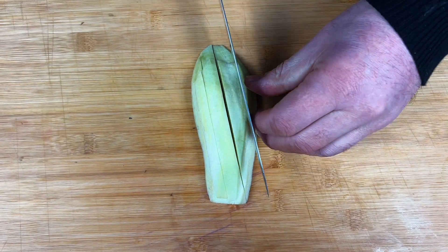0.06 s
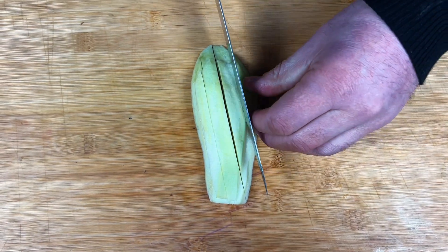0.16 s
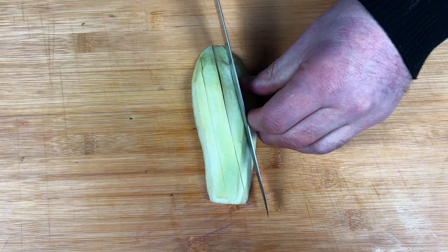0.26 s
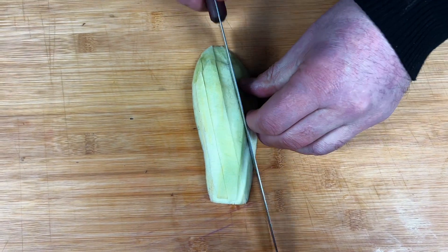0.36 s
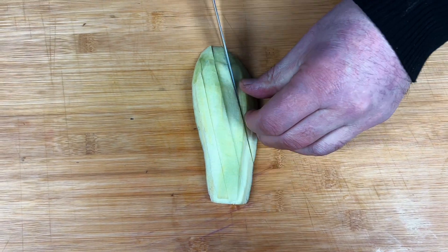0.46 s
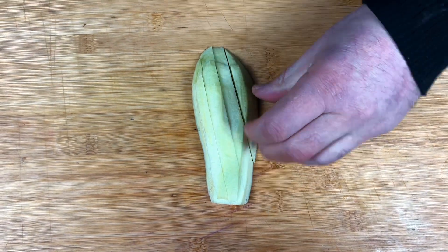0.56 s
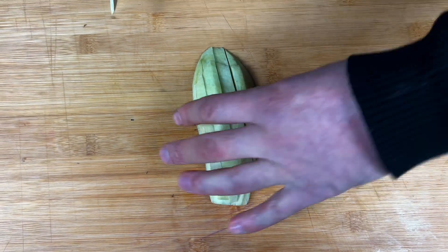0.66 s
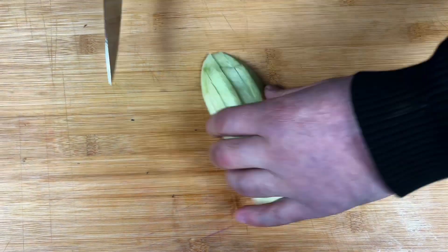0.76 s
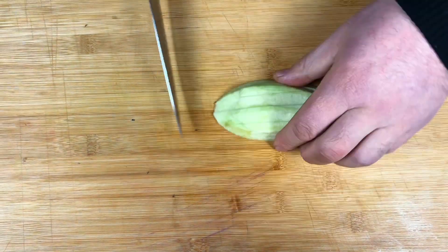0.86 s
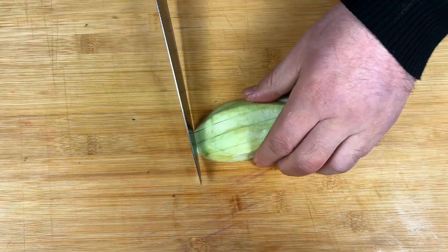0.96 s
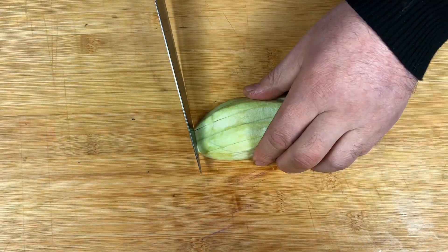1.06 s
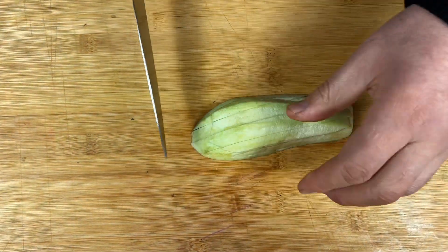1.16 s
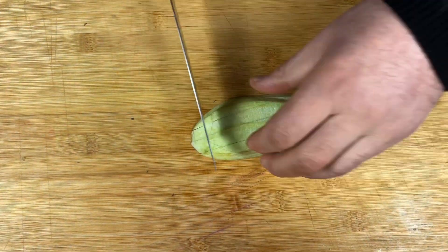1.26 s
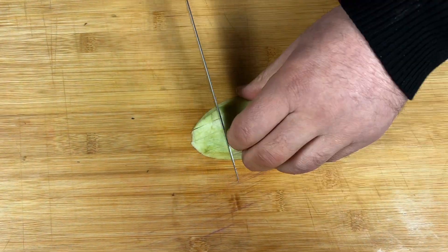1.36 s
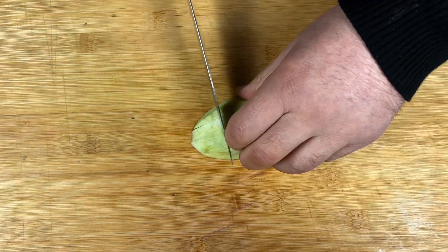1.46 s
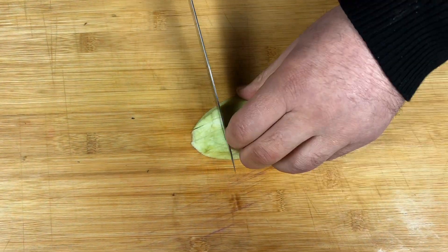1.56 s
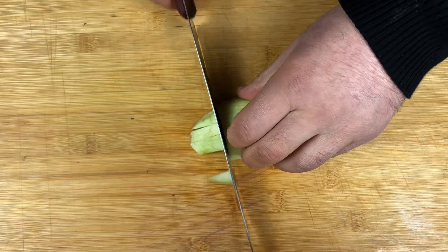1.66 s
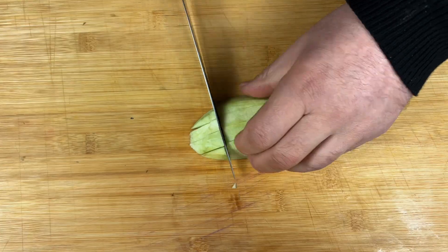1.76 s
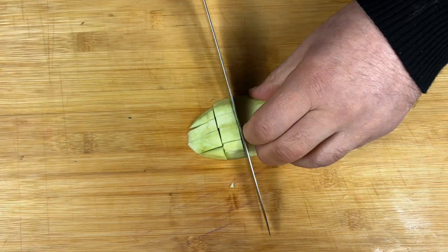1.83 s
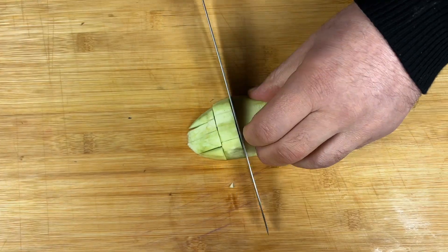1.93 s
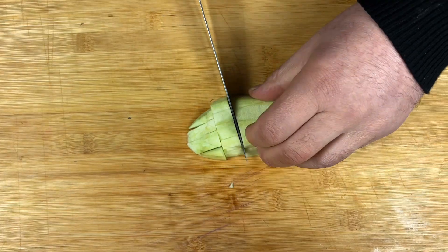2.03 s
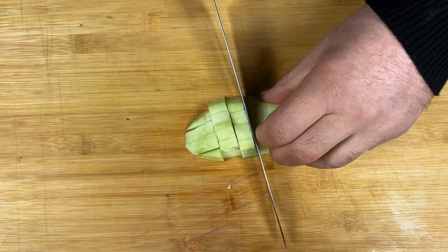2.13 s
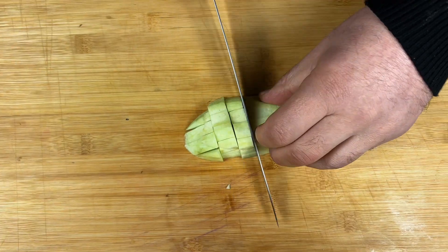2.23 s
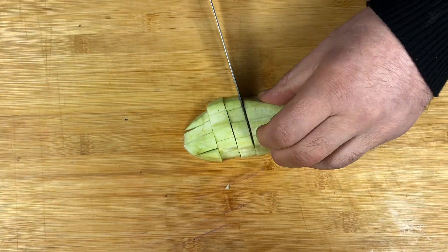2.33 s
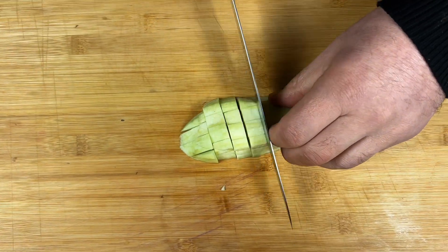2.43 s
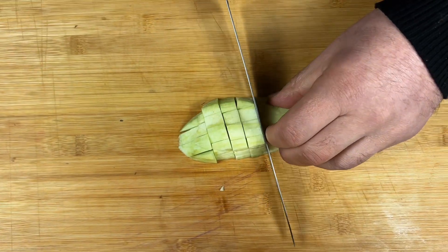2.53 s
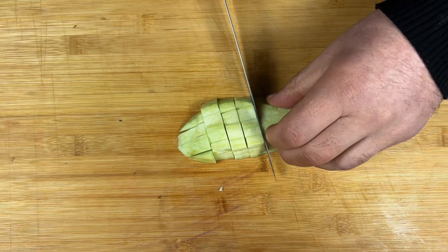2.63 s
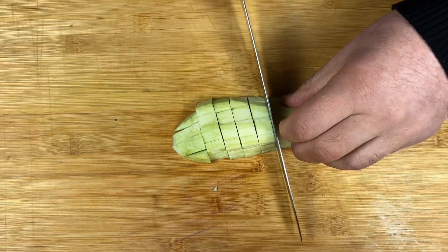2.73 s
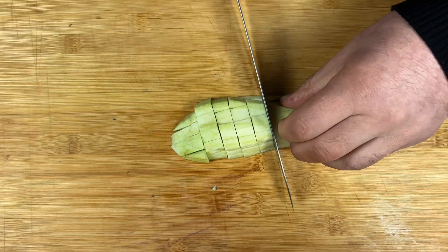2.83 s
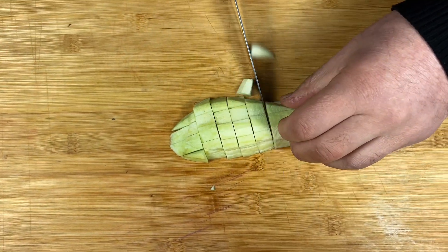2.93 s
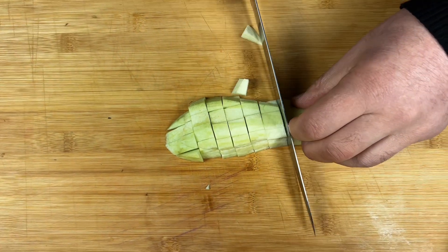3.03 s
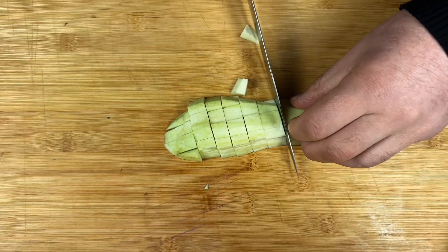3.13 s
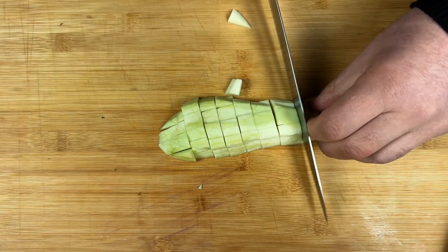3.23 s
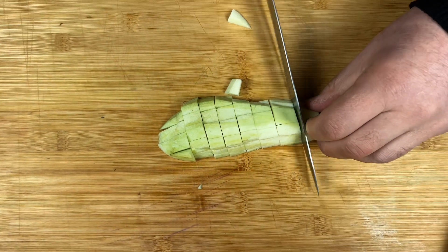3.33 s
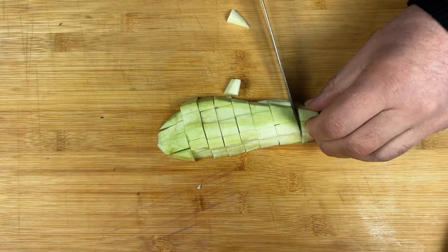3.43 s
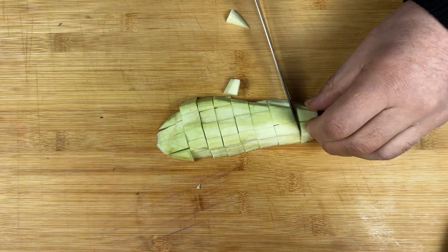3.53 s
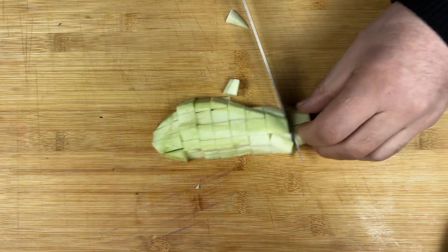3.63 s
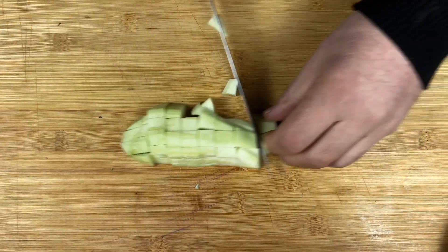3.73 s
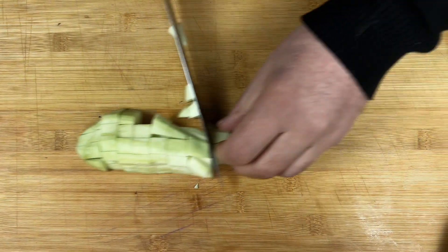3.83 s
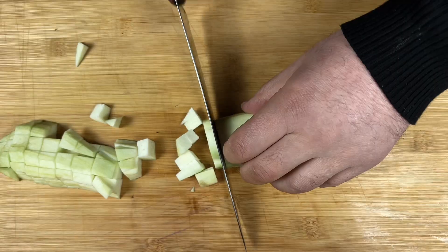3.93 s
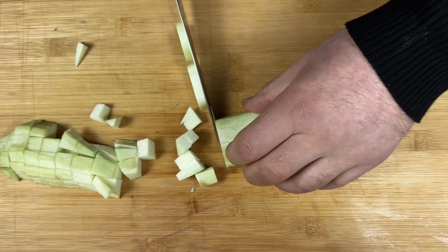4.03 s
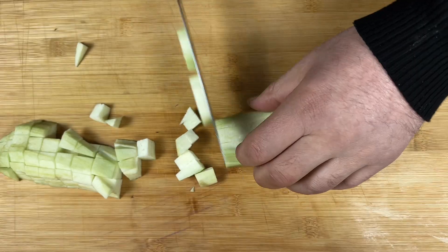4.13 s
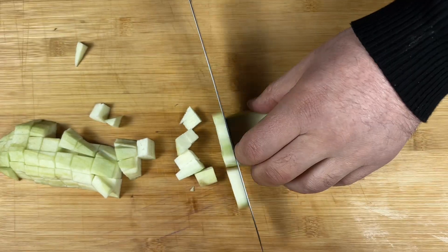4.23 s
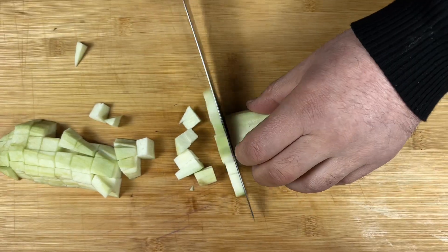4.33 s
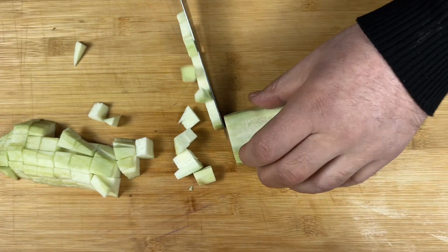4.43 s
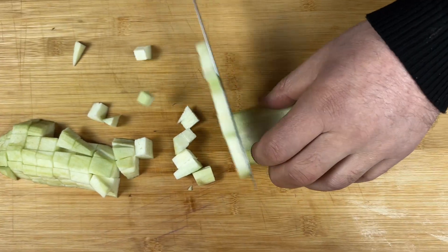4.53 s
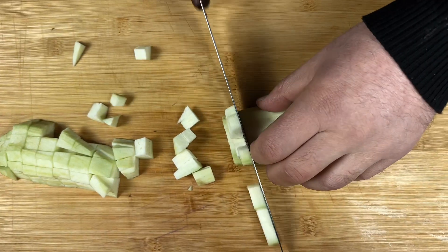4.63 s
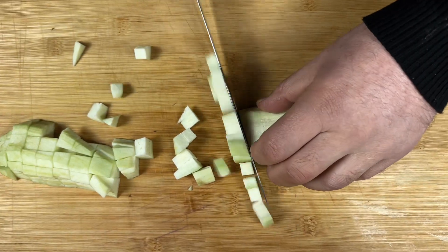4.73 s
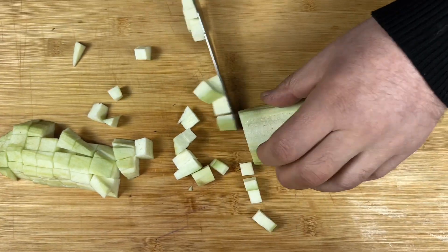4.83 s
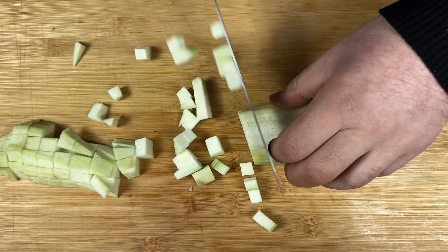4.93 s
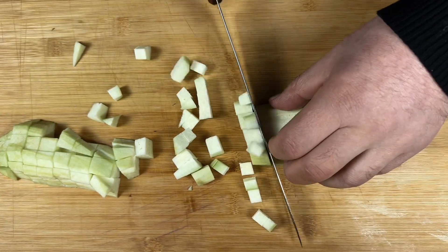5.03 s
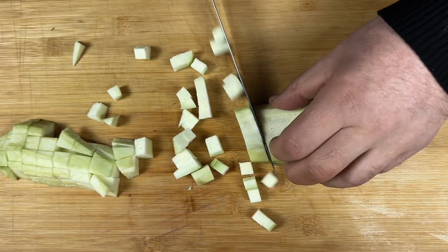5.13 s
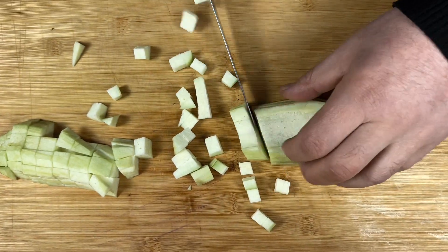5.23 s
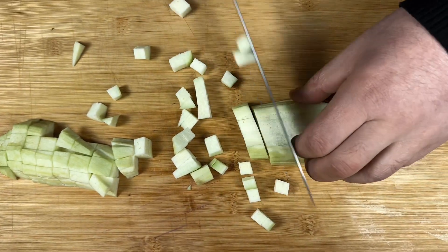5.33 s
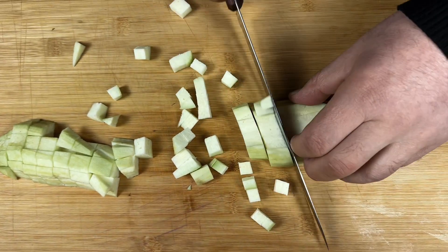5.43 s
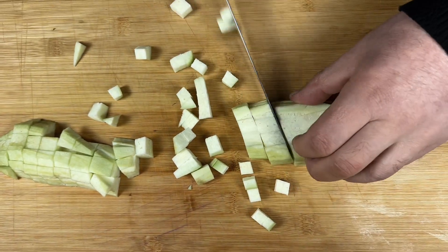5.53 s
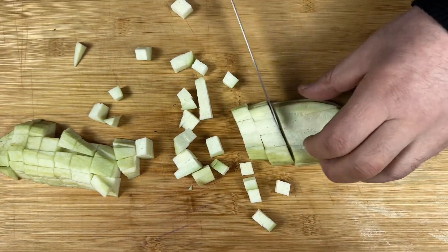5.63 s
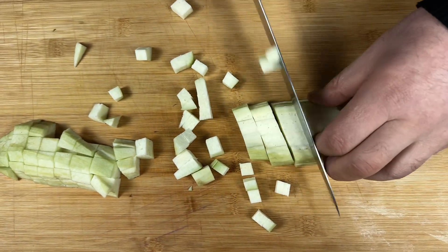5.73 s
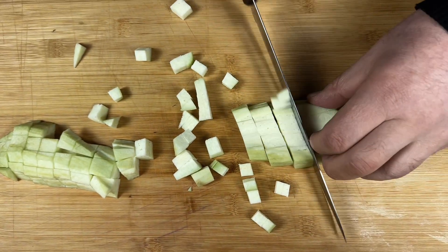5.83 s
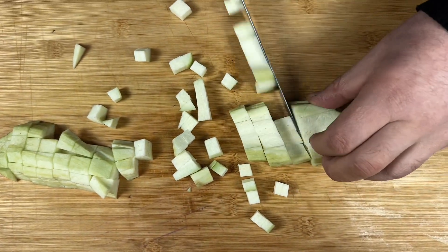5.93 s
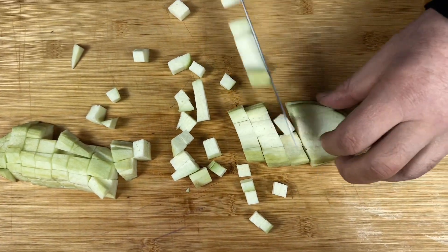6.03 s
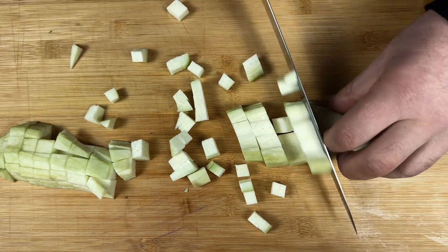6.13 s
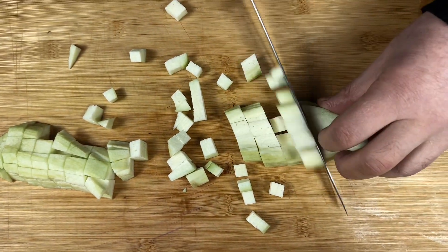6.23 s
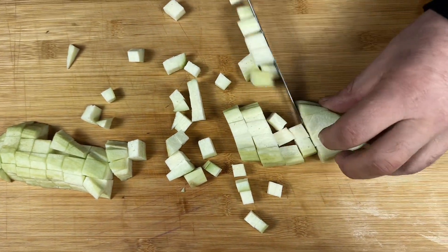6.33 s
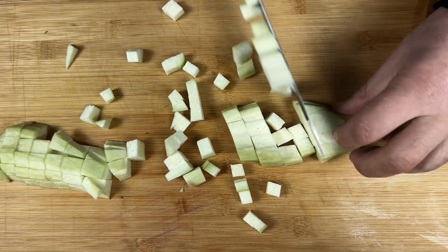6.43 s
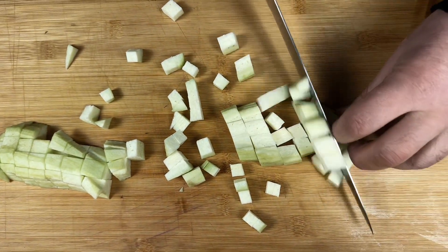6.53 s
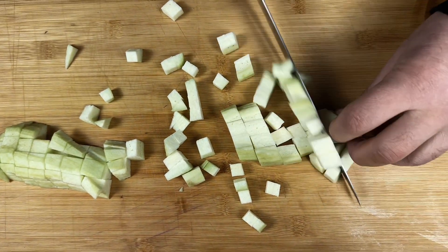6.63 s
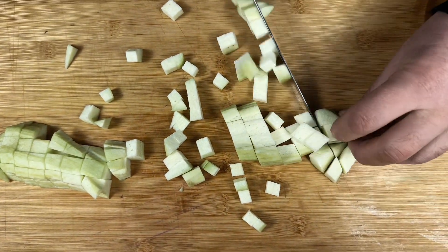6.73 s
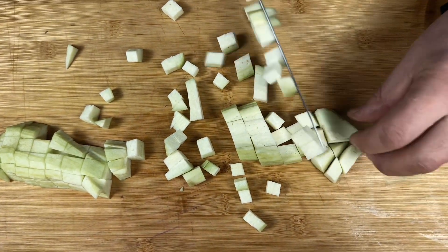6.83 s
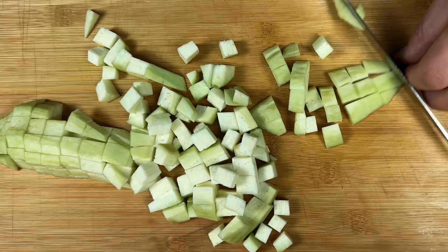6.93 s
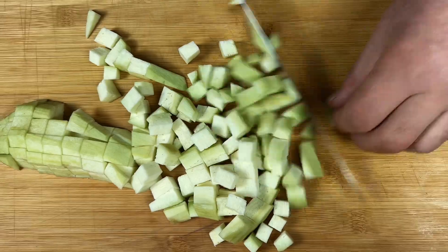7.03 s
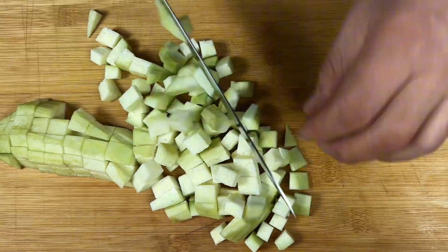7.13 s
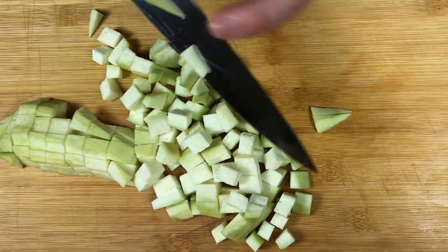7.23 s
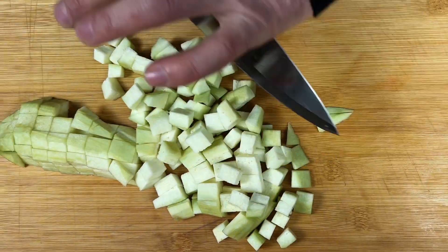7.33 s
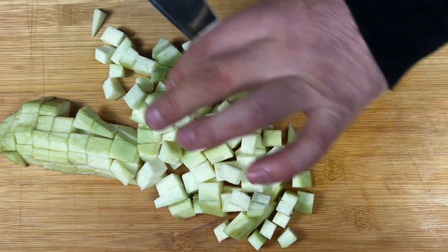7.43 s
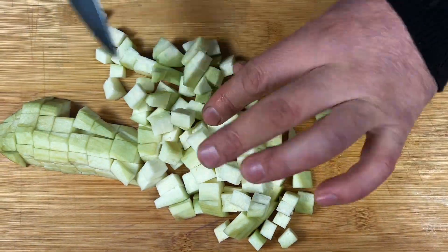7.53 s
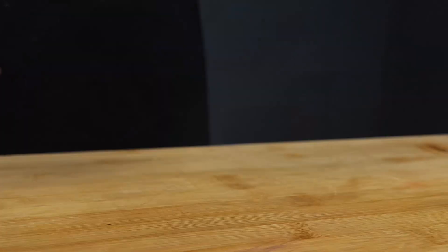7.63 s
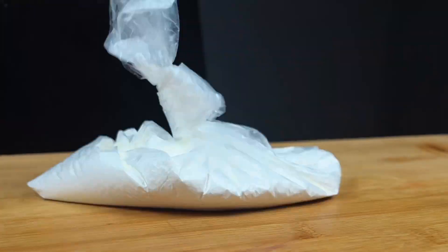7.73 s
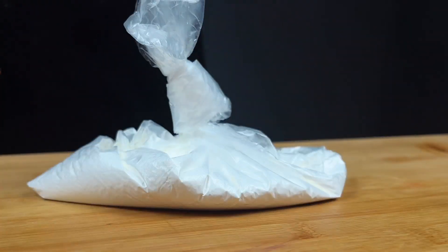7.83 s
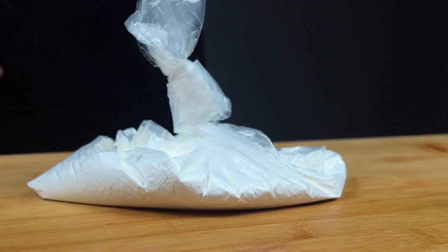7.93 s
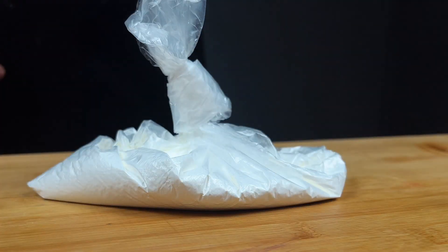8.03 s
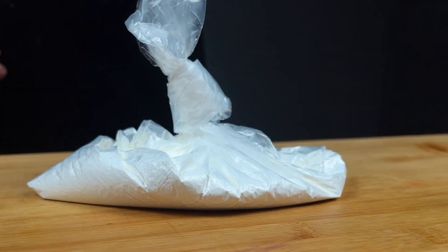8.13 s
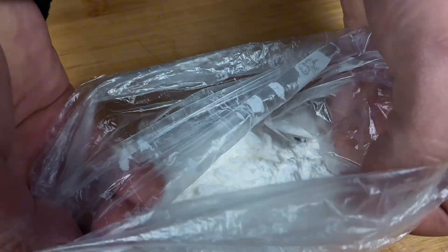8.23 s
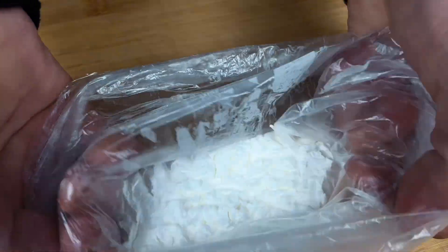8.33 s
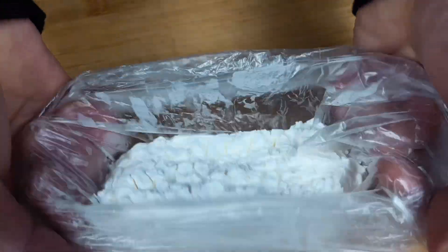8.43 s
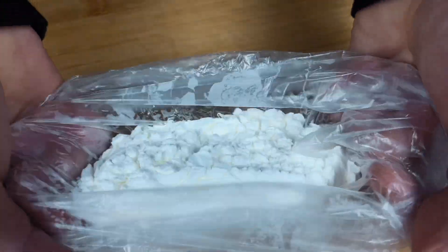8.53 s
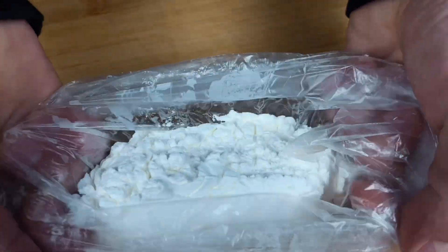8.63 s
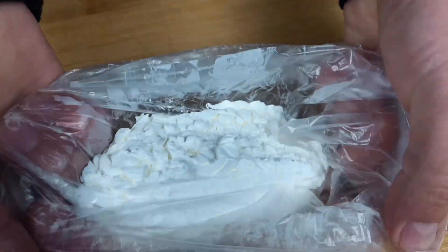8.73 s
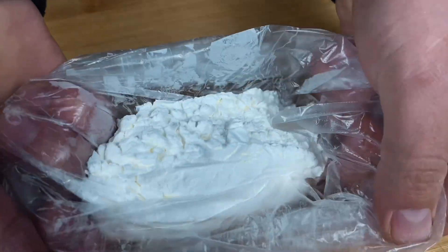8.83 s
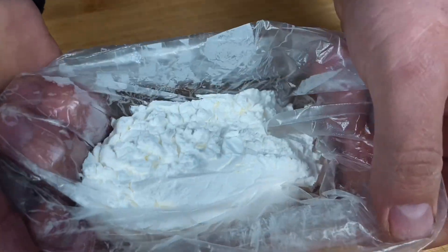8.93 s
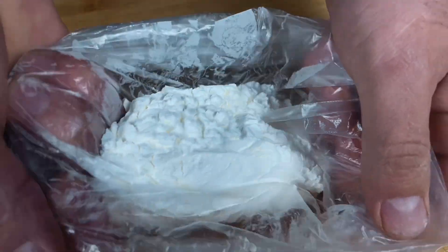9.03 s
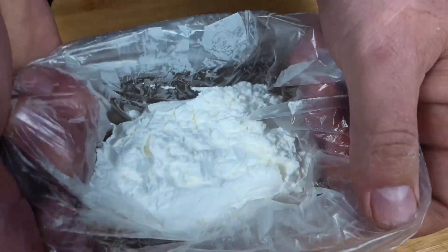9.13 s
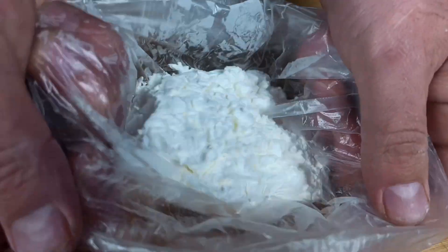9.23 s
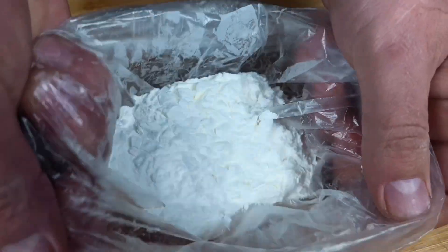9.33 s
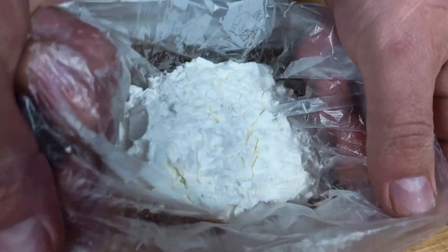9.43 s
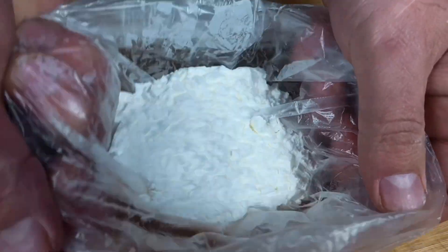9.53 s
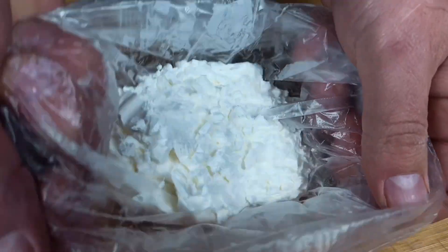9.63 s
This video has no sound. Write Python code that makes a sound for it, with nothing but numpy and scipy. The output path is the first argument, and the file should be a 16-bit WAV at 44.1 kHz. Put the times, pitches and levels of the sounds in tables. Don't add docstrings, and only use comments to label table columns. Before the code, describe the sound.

Close up in a small, fairly dry kitchen, a knife dices a soft vegetable: each stroke crunches, knocks hard on a hollow-sounding wooden board and rasps back along it. After the last light scrape, a heavy bag of powder slaps and thumps down and settles. Then hands crinkle thin plastic close to spaced stereo microphones, with crisp pops.

```python
import sys
import numpy as np
from scipy import signal
from scipy.fft import rfft, irfft, next_fast_len
from scipy.io import wavfile
from scipy.ndimage import map_coordinates

SR = 44100
rng = np.random.default_rng(int(sys.argv[2]) if len(sys.argv) > 2 else 0)


def how_loud(loudness_db):
    steps = np.asarray(loudness_db, float) / 20
    return 10 ** steps


def transcribe(u):
    v = np.clip(np.atleast_2d(u).T, -1, 1)
    q = np.round(v * 32767).astype(np.int16)
    wavfile.write(sys.argv[1], SR, q)


N = 426447

DROP_S, SCENE_CHANGE_S = 7.669, 8.148
HELD_DB = -38.5

# (start_s, knock_peak_db, bright_re_knock_db, edge_tick_re_knock_db, contact_ms)
CHOPS = [(0.32, -8, 1.5, -35, 1.9), (0.945, -17.5, -3, -32, 2.2), (1.677, -8, -2, -48, 2.6),
         (1.893, -4, 4, -32.5, 1.6), (2.188, -20.5, 2.5, -24, 2.8), (2.522, -2, -1.5, -30, 2),
         (3.011, -3, -1, -28.5, 1.4), (3.339, -9, 8.5, -19.5, 1.48), (4.306, -6, -1.5, -18, 1.4),
         (4.635, -5.5, 1.5, -52, 1.64), (5.03, -8, -1, -49, 1.38), (5.407, -6.5, -2.5, -48, 1.86),
         (6.212, -9.5, 0.5, -36, 1.8), (6.611, -10, -3, -49, 1.4)]
PRESSES = [(0.734, -42.5, -18, -15, 3.5), (0.933, -26, -7, -26, 4.1), (1.053, -43.5, -28, -33, 5),
           (2.786, -14, -12, -42, 2.3), (3.942, -35, 4, -12, 1.6), (4.244, -32, -13.5, -32, 3.8),
           (4.556, -32, -14, -26, 3.6), (4.964, -27.5, -15, -21, 3.1), (5.355, -35.5, -9, -11.5, 3.2),
           (5.75, -38.5, -10, -23, 4.3), (5.786, -15, -4.5, -47, 11), (6.117, -36, -13, -20, 5.7),
           (6.192, -19.5, 4.5, -20, 7.7), (6.89, -37.5, 3, -8, 4.2), (7.486, -45, -24.5, -30.5, 3.37),
           (2.81, -15.5, -14.5, -38, 2.3)]
# (pitch_hz, likeness from -1 to 1)
LIKENESS = [(60, .8), (300, .93), (470, .78), (650, .2), (1400, .03), (7000, 0), (15000, .15)]


def knocks():
    rebounds = [(1.692, -19.5, -12, -40, 2.6), (1.908, -12, -10, -40.5, 3.1), (2.54, -15, -9.5, -40.5, 3),
                (3.028, -12.5, -10, -40, 3.1), (3.357, -14.5, -6.5, -40.5, 3), (4.324, -22, -9.5, -41, 2.8),
                (4.652, -23, -10, -40, 2.7), (5.048, -25, -9, -40, 2.7), (5.425, -22, -10, -41, 2.9),
                (6.229, -23, -2, -40, 2.8), (6.628, -29, -10, -40, 2.97)]
    # (pitch_hz, level_db, t60_s)
    board_low = [(180, -12.5, 0.17), (225, -35, 0.083), (295, -9, 0.018), (351.5, 9.5, 0.061),
                 (406, -7, 0.05), (431.5, -3.5, 0.12)]
    board_high = [(534, -5, 0.048), (713, -1, .04), (756, -10.5, 0.057), (880, 1, 0.027), (932, -4.5, 0.17),
                  (1107, 0, 0.062), (1160, 1.5, 0.052), (1285, 2.5, .035), (1450, -9.5, 0.045),
                  (1624, -1, 0.086), (1780, -2.5, 0.011), (2020, -10.5, 0.025), (2086, -6, 0.043),
                  (2370, -13.5, .02), (3000, -17.5, 0.035)]
    # (knock_s, pitch_hz, level_db)
    spots = [(.32, 1700, 6), (.944, 750, 13), (.93, 750, 13), (1.676, 1600, 11), (1.893, 1600, 8),
             (2.188, 1200, 3), (2.522, 1500, 7), (2.786, 750, 5), (3.011, 1093, 5.5), (3.339, 2400, 8.5),
             (4.635, 2100, 6.5), (5.03, 1000, 6.5), (1.676, 750, -6), (1.893, 800, -7), (4.306, 1100, 9),
             (3.339, 781, -7), (2.522, 1000, 4), (5.407, 1000, 8), (5.407, 2200, 4.5), (5.786, 720, 3),
             (6.192, 2400, 11), (6.212, 2300, 9), (6.611, 1100, 5), (6.611, 2300, 2)]
    spot_octaves, low_lag_s = 0.3, 0.0013
    out = np.zeros((2, N))
    t_ms = np.arange(4000) / SR * 1000
    edge = signal.butter(2, [2800, 7000], "band", fs=SR, output="sos")
    wood = signal.butter(2, [500, 3400], "band", fs=SR, output="sos")
    low_cut = signal.butter(4, 165, "high", fs=SR, output="sos")
    for s, knock_db, bright_db, tick_db, contact_ms in CHOPS + PRESSES + rebounds:
        u = np.minimum(t_ms / max(contact_ms, 0.2), 15)
        rough = rng.standard_normal((3, len(u)))
        swell = u ** 2 * np.exp(-u) + 0.2 * (1 - np.exp(-u))
        burst = u ** 2 * np.exp(-2.5 * u)

        low = np.array(board_low) * [1, np.clip(contact_ms / 3, 1, 2), np.clip(contact_ms / 4, 1, 1.4)]
        low_ring = swell * struck(low, 0.98, size=4000)
        add(out, s + low_lag_s, signal.sosfilt(low_cut, low_ring), knock_db)

        high = np.array(board_high)
        tilt_db = 0.7 * min(bright_db + 3, 0) - 2.6 * np.clip(contact_ms - 2, 0, 3)
        high[:, 1] += tilt_db * np.log2(high[:, 0] / 700)
        for spot_s, hz, db in spots:
            if abs(s - spot_s) < 0.005:
                high[:, 1] += db * np.exp(-(np.log2(high[:, 0] / hz) / spot_octaves) ** 2)
        scatter = (burst * rough[0])[None, :1500]
        bright = signal.fftconvolve(struck(high, 2.9, size=2501), scatter)
        bright = bright * (0.23 + np.exp(-0.4 * u))
        add(out, s, signal.sosfilt(wood, bright), knock_db + bright_db)

        tick = burst * (rough[1:] + 0.6 * rough[0])
        add(out, s, signal.sosfilt(edge, tick), knock_db + tick_db)
    return out


def strokes():
    # (pitch_hz, level_db per Hz)
    rumble_colour = [(76, -51.5), (130, -24.5), (189, -7), (259, -7.5), (351, -4), (462, -4), (506, -16),
                     (700, -14.5), (910, -43.5), (1540, -120)]
    rasp_colour = [(320, -32.5), (550, -6.5), (815, -7), (1050, -3), (1450, -4), (2100, -6.5),
                   (2750, -14.5), (3600, -19.5), (4680, -30.5), (7920, -120)]
    hiss_colour = [(1530, -28), (2600, -1), (5300, -7), (10100, -18.5), (12700, -24), (13700, -27.5),
                   (15700, -19), (16200, -39.5)]
    counter_colour = [(20, -20.5), (30, -5.5), (55, 0), (100, -4), (135, -6.5), (170, -28)]
    counter_rest_db, counter_share_db = -82.5, -26.5
    rumble, rasp, hiss = cuts() + drags()

    shake = jolts() + how_loud(counter_rest_db) + how_loud(counter_share_db) * rumble
    shake = shake + crunch(before_s=0.012, after_s=0.045, crunch_db=-48, bright_share=0.1)
    rumble = rumble + crunch(before_s=0.007, after_s=0.035, crunch_db=-21, bright_share=0.1)
    hiss = hiss + crunch(before_s=0.015, after_s=0.022, crunch_db=-43.5, bright_share=0.33)
    rasp = rasp + crunch(before_s=0.0039, after_s=0.019, crunch_db=-20, bright_share=1)
    rasp = rasp + crunch(before_s=0.0083, after_s=0.04, crunch_db=-28, bright_share=1.2)

    scrape = singing(friction(rasp_colour, grain_db=2.5, lumpy_db=0.5, lumps_per_s=180))
    edge = friction(hiss_colour, grain_db=-0.5, lumpy_db=2.2, lumps_per_s=40)
    wet = rasp * how_loud(-1.5) * scrape + hiss * edge
    wet = whistling(patchy(wet, patch_db=4.5, patch_hz=220.2, patch_s=0.04))
    board = rumble * friction(rumble_colour, grain_db=1.5, lumpy_db=3.0, lumps_per_s=60)
    shudder = shake * friction(counter_colour, grain_db=-1.1, lumpy_db=1.0, lumps_per_s=12)
    return friction_dips() * (board + wet) + shudder


def crunch(before_s, after_s, crunch_db, bright_share):
    soft_loss_db_per_ms = 7.5
    gain = np.zeros(N)
    k = np.arange(-3000, 12000)
    shape = np.exp(np.minimum(k / SR / before_s, -k / SR / after_s))
    for s, knock_db, bright_db, _, contact_ms in CHOPS + PRESSES:
        loss_db = soft_loss_db_per_ms * np.clip(contact_ms - 2.6, 0, 1)
        gain[round(s * SR) + k] += how_loud(knock_db - loss_db + bright_share * bright_db + crunch_db) * shape
    return gain


def cuts():
    # (start_s, end_s,
    # rumble_db, rasp_db, hiss_db)
    rubs = [(0.11, 0.133, -69, -92, -84), (0.236, .258, -59.5, -68, -70), (0.257, 0.313, -49, -57, -58),
            (0.763, 0.885, -60, -65.5, -72.5), (0.967, 0.977, -62, -74, -65),
            (1.057, 1.068, -62, -81, -92), (1.132, 1.168, -61.5, -76, -80), (1.57, 1.615, -65, -85, -85),
            (1.614, 1.67, -48, -56.5, -59.5), (2.454, 2.499, -40, -54, -54.5),
            (3.593, 3.656, -45.5, -52, -61), (3.786, 3.904, -47.5, -60.5, -59.5),
            (4.196, 4.29, -48, -56, -59), (4.56, 4.613, -43, -61.5, -59),
            (4.957, 5.01, -43.5, -57.5, -59), (5.346, 5.396, -47, -58.5, -55.5),
            (5.729, 5.787, -44.5, -55, -56.5), (6.107, 6.188, -47.5, -54, -57.5),
            (6.495, 6.538, -50, -56, -56), (6.533, 6.57, -42, -53.5, -56.5),
            (1.874, 1.889, -34, -52, -70), (4.289, 4.3, -30, -48, -66), (6.593, 6.609, -38, -44, -54),
            (3.322, 3.34, -40, -42, -60), (5.774, 5.802, -37, -43, -64), (1.07, 1.074, -57, -80, -90),
            (3.901, 3.943, -45.5, -65, -58), (2.949, 3.004, -50.5, -44.5, -50.5),
            (6.78, 6.868, -61, -74, -85), (7.03, 7.097, -61, -79, -90), (7.482, 7.56, -59.5, -76, -92),
            (7.591, 7.609, -67, -68, -60), (7.625, 7.65, -64, -67.5, -64), (7.65, 7.668, -50, -54, -60),
            (3.66, 3.79, -57, -62.5, -67), (7.1, 6.494, -61, -67, -76),
              (6.95, 7.011, -45.5, -57.5, -57.5), (3.5, 3.601, -51, -54.5, -68),
              (8.06, 8.131, -76.5, -77.5, -73), (2.75, 2.771, -40.5, -58.5, -62.5),
              (2.2, 2.251, -34.5, -36.5, -64.5), (1.655, 1.676, -38, -40, -60),
              (6.195, 6.215, -40, -37.5, -50), (5.99, 6.07, -64, -66, -76), (2.524, 2.545, -40, -33, -55),
              (3.012, 3.03, -40, -33, -55)]
    attack_s = 0.0046 * np.array([[1], [3.0], [5.0]])
    growth_db, fade_db_per_s = 4, 700
    out = np.zeros((3, N))
    t = np.arange(SR // 2) / SR
    for start, end, *level_db in rubs:
        long = max(end - start, 0.01)
        shape_db = growth_db * (np.minimum(t / long, 1) - 0.5) - fade_db_per_s * np.maximum(t - long, 0)
        shape = np.minimum(t / attack_s, 1) * how_loud(shape_db)
        out[:, round(start * SR) + np.arange(len(t))] += how_loud(np.array(level_db))[:, None] * shape
    return out


def drags():
    # (start_s, fastest_s, lifts_s, rasp_db, hiss_db)
    draws = [(0.386, 0.505, .56, -42, -43.5), (1.721, 1.845, 1.825, -37.5, -45.5),
             (1.92, 2.084, 2.13, -33.5, -46.5), (2.189, 2.317, 2.398, -34, -43),
             (2.55, 2.686, 2.714, -34.5, -42.5), (2.813, 2.88, 2.92, -35, -42.5),
             (3.058, 3.156, 3.263, -34.5, -44.5), (3.351, 3.387, 3.52, -34, -52.5),
             (3.897, 3.988, 4.04, -38, -45.5), (4.32, 4.351, 4.385, -36, -49),
             (4.673, 4.737, 4.85, -39.5, -47), (5.054, 5.12, 5.182, -39.5, -48),
             (5.437, 5.498, 5.59, -39, -49), (5.781, 5.88, 5.895, -36.5, -47),
             (6.219, 6.237, 6.36, -36, -51.5), (6.613, 6.68, 6.745, -40, -46),
             (6.886, 6.975, 6.94, -41, -43)]
    # (rumble_db, rasp_db, hiss_db)
    slow_start_db = (-1, 5, 17)
    # (rumble, rasp, hiss in db per s)
    sag_db_per_s = (40.5, 40.5, 62)
    lift_db_per_s = (150, 229, 230.5)
    rumble_re_rasp_db = -10.5
    out = np.zeros((3, N))
    t = np.arange(SR // 2) / SR
    slow, sag, lift = np.array([slow_start_db, sag_db_per_s, lift_db_per_s])[:, :, None]
    for start, fastest, lifts, rasp_db, hiss_db in draws:
        rise = max(fastest - start, 0.01)
        db = np.array([[rasp_db + rumble_re_rasp_db], [rasp_db], [hiss_db]])
        db = db - slow * np.maximum(1 - t / rise, 0) ** 2
        db = db - sag * np.maximum(t - rise, 0)
        db = db - lift * np.maximum(t + start - lifts, 0)
        out[:, round(start * SR) + np.arange(len(t))] += how_loud(db) * np.minimum(t / 0.022, 1)
    return out


def singing(x):
    # (pitch_hz, width_hz, level_db)
    sings = [(1108, 58, -11), (2170, 110, -16), (900.4, 35, -14), (697, 61, -6)]
    out = x.copy()
    for hz, width, db in sings:
        out += how_loud(db) * 2 * signal.lfilter(*signal.iirpeak(hz, hz / width, fs=SR), x)
    return out


def whistling(x):
    # (middle_s, half_length_s, pitch_hz, level_re_rasp_db)
    whistles = [(0.452, .04, 1550, 2), (.53, .05, 2370, -5), (1.8, .03, 2000, -4.5), (1.95, .03, 1120, -3),
                (2.03, .04, 2420, -3), (2.07, 0.035, 1710, -3), (2.21, .03, 1220, 4), (2.314, .04, 3600, 2),
                (2.354, .05, 1050, -3), (2.37, .04, 2200, -7), (2.675, 0.053, 1030, 2.5),
                (2.66, 0.037, 3600, -4), (2.733, 0.027, 2450, -3), (2.87, .02, 2120, 4),
                (2.89, 0.034, 3730, -3.5), (2.95, 0.046, 1035, 0), (3.15, .04, 2200, -7),
                (3.183, .04, 3600, 2.5), (3.39, 0.036, 1900, -2), (4.23, .04, 1150, 0),
                (4.346, 0.057, 1150, 3), (4.47, .04, 1200, 1), (4.59, .03, 1150, 0),
                (4.74, .04, 2060, -2.5), (5.12, 0.049, 1900, -2), (5.503, .05, 2200, 1),
                (5.88, .05, 2150, 0.5), (5.9, .04, 1300, -3), (6.26, .03, 1590, -1),
                (6.222, 0.029, 2900, 8), (6.95, .03, 2000, -12)]
    sharpness = 23
    out = x.copy()
    for s, half, hz, db in whistles:
        k = np.arange(round((s - 0.15) * SR), round((s + 0.15) * SR))
        ringing = signal.lfilter(*signal.iirpeak(hz, sharpness, fs=SR), x[:, k])
        out[:, k] += how_loud(db + 7) * np.exp(-((k / SR - s) / half) ** 2) * ringing
    return out


def friction_dips():
    # (middle_s, half_length_s, loss_db)
    dips = [(3.313, 0.0099, 15), (2.178, .006, 7), (2.775, .006, 5), (2.2, 0.01, 1), (1.868, .006, 5),
            (1.005, .035, 9), (.922, .006, 8), (3.915, .022, 4), (4.87, .04, 5), (6.585, .008, 5),
            (4.28, .006, 5)]
    t = np.arange(N) / SR
    return how_loud(-sum(db * np.exp(-((t - s) / half) ** 4) for s, half, db in dips))


def jolts():
    # (peak_s, level_db)
    throbs = [(.15, -60.5), (.75, -65), (1.9, -49), (2.2, -48), (2.54, -45), (3.02, -45), (3.35, -42.5),
              (7.84, -52), (7.92, -59), (7.97, -56), (8.04, -59), (8.08, -57.5)]
    rise_s, fall_s = 0.024, 0.068
    t = np.arange(N) / SR
    return sum(how_loud(db) * np.exp(np.minimum((t - s) / rise_s, (s - t) / fall_s)) for s, db in throbs)


def drop():
    # (pitch_hz, level_db, t60_s)
    thump_modes = [(113, -20, 0.2), (178, -3, 0.45), (206, -3.5, 0.38), (222, -7.5, 0.68),
                   (262.7, -5, 0.35), (390, -4, 0.25), (453, -3.5, 0.2), (545, -9, 0.3), (705, -12.5, 0.19),
                   (915, -16, 0.18), (1030, -10.5, 0.066)]
    # (pitch_hz, level_db per Hz)
    tail_colour = [(47, -42.5), (80, -24), (130, -19), (200, -4.5), (310, -11), (374, -11), (592, -22),
                   (684, -25), (1010, -22.5), (1310, -29), (2500, -36), (3250, -69), (5500, -120)]
    # (fast_db, fast_db_per_s, slow_db, slow_db_per_s)
    tail_decay = (-7.5, 429.5, -18.5, 101.5)
    thump_db, slap_db = -3.5, -3
    out = np.zeros((2, N))
    t = np.arange(16000) / SR
    no_bass = signal.butter(3, 120, "high", fs=SR, output="sos")
    thump = struck(thump_modes, 0, size=16000) * (1 - np.exp(-t / 0.003))
    thump = thump * (0.51 + np.exp(-t / 0.015))
    add(out, DROP_S, signal.sosfilt(no_bass, thump), thump_db)

    deep = np.sin(2 * np.pi * 47 * t) * t * np.exp(-t / 0.041)
    add(out, DROP_S, deep * how_loud([[5], [-12]]), -35)
    low = np.sin(2 * np.pi * 72 * t) * t * np.exp(-t / 0.021)
    add(out, DROP_S + 0.004, low * how_loud([[4], [-14]]), -23)

    t_ms = np.arange(600) / SR * 1000
    plastic = signal.butter(2, [900, 4500], "band", fs=SR, output="sos")
    slap = rng.standard_normal((2, len(t_ms))) * np.exp(-t_ms / 4.1)
    add(out, DROP_S, signal.sosfilt(plastic, slap), slap_db)

    scattered = np.clip((np.arange(N) / SR - DROP_S) / 0.05, 0, 1)
    tail = friction(tail_colour, grain_db=2.0, lumpy_db=0.5, lumps_per_s=40)
    return out + scattered * settling(*tail_decay) * how_loud(-6.5) * tail


def bag():
    # (pitch_hz, level_db per Hz)
    crinkle_colour = [(700, -25.5), (1000, -5), (1630, -4), (3600, 1), (6160, -0.5), (7200, -4.5),
                      (8870, 0), (12000, -3), (15900, -5.5), (16200, -48.5)]
    handling_colour = [(15, -31), (25, -13.5), (75, 0), (501, -4), (790, -0.5), (1110, 0.5), (1310, -11.5),
                       (1400, 1), (1820, -29), (3080, -120)]
    # (fast_db, fast_db_per_s, slow_db, slow_db_per_s)
    crinkle_decay = (-21, 480, -35.5, 127)
    # (start_s, peak_db)
    snaps = [(7.597, -45), (7.8685, -40), (7.888, -35), (8.112, -45), (8.121, -46), (8.268, -22),
             (8.3683, -13), (8.3725, -17), (8.378, -20), (8.389, -20), (8.993, -23), (8.9974, -25),
             (9.003, -25), (9.0073, -22), (9.017, -27), (9.0496, -25.5), (9.5846, -19.5)]
    # (start_s, pitch_hz, peak_db)
    bumps = [
        (8.395, 95, -46),
        (9.4, 110, -47),
        (9.645, 60, -41),
    ]
    handling_db, follows = -10.5, 0.63
    squeeze = hands()
    grains = friction(crinkle_colour, grain_db=3.2, lumpy_db=1.6, lumps_per_s=150)
    grains = patchy(grains, patch_db=1.7, patch_hz=920, patch_s=0.054)
    out = (settling(*crinkle_decay) + squeeze) * grains

    late_db = 4.0 * (np.arange(N) / SR > 9.4)
    rumble = how_loud(handling_db + (1 - follows) * HELD_DB + late_db) * squeeze ** follows
    out += rumble * friction(handling_colour, grain_db=4.0, lumpy_db=2.5, lumps_per_s=24)

    film = signal.butter(2, [3500, 14000], "band", fs=SR, output="sos")
    for s, db in snaps:
        pop = rng.standard_normal((2, 120)) * np.exp(-np.arange(120) / 14)
        add(out, s, signal.sosfilt(film, pop), db - 1.0)
    t = np.arange(4000) / SR
    for s, hz, db in bumps:
        bump = np.sin(2 * np.pi * hz * t) * t * np.exp(-t / 0.016)
        add(out, s - 0.02, bump * np.ones((2, 1)), db)
    return out * how_loud([[0.45], [-0.45]])


def hands():
    # (middle_s, half_length_s, crinkle_db)
    squeezes = [(8.232, 0.098, -26), (8.326, 0.059, -28.5), (8.374, .018, -20.5), (8.444, 0.052, -32.5),
                (8.582, 0.054, -30), (8.684, 0.052, -30.5), (8.802, 0.064, -37), (9.001, 0.051, -31.5),
                (9.06, .04, -35), (9.125, .025, -28), (9.24, 0.035, -31), (9.305, .025, -31),
                (9.426, 0.03, -31.5), (9.5, 0.032, -32), (9.605, 0.028, -28), (9.665, 0.023, -29)]
    i = round(SCENE_CHANGE_S * SR)
    t = np.arange(i, N) / SR
    power = how_loud(HELD_DB) ** 2
    for s, half, db in squeezes:
        power = power + how_loud(db) ** 2 * np.exp(-((t - s) / half) ** 2)
    out = np.zeros(N)
    out[i:] = np.sqrt(power)
    return out


def settling(fast_db, fast_db_per_s, slow_db, slow_db_per_s):
    t = np.arange(N) / SR - DROP_S - 0.01
    on = (t > 0) & (t < SCENE_CHANGE_S - DROP_S - 0.02)
    t = np.clip(t, 0, 1)
    return on * (how_loud(fast_db - fast_db_per_s * t) + how_loud(slow_db - slow_db_per_s * t))


def kitchen(x):
    echo_s, echo_db = 0.0205, -19
    tail_db, t60_s, dull_hz = -14, 0.15, 920
    t = np.arange(SR // 2) / SR
    mid, side = rng.standard_normal((2, len(t))) * how_loud(-60 * t / t60_s) * (t > 0.006)
    no_bass = signal.butter(2, 550, "high", fs=SR, output="sos")
    tail = mid + signal.sosfilt(no_bass, side) * [[1], [-1]]
    tail = how_loud(tail_db) * tail / np.sqrt(np.sum(mid ** 2))
    tail[:, round(echo_s * SR)] += how_loud(echo_db)
    dull = signal.butter(2, dull_hz, fs=SR, output="sos")
    return signal.sosfilt(dull, signal.fftconvolve(x, tail, axes=-1)[:, :N])


def room_tone():
    # (pitch_hz, level_db per Hz)
    tone_colour = [(15, -49.5), (25, -11), (112, -16.5), (197, -1.5), (231, -5), (340, -9), (407, -23),
                   (1250, -16), (1620, -8), (3210, -31), (4500, -30), (7350, -13.5), (8800, -30.5),
                   (12000, -31), (15600, -64), (22000, -120)]
    return how_loud(-71.5) * friction(tone_colour, grain_db=3.5, lumpy_db=2.0, lumps_per_s=3.5)


def friction(spectrum, grain_db, lumpy_db, lumps_per_s):
    size = next_fast_len(N)
    grain = how_loud(grain_db * np.minimum(rng.standard_exponential(N), 4))
    slips = rng.standard_normal((2, N)) * grain
    hz = np.arange(size // 2 + 1) * SR / size + 1e-3
    mid, side = rfft(slips * how_loud(lumpy_db * drift(lumps_per_s)), size)
    alike = np.clip(at_hz(LIKENESS, hz), -1, 1)
    colour = how_loud(at_hz(spectrum, hz)) * (hz > spectrum[0][0]) * (hz < spectrum[-1][0])
    pair = np.sqrt(1 + alike) * mid + np.sqrt(1 - alike) * side * [[1], [-1]]
    return rms_one(irfft(colour * pair, size)[:, :N])


def struck(modes, spread_db, size):
    # (pitch_hz, left_minus_right_db)
    lean = [(60, 2.0), (150, 2.0), (380, 0.0), (950, -0.5), (2380, -2.0), (5980, 1.5), (15000, 0.0)]
    hz, db, t60 = np.transpose(modes)[:, :, None]
    t = np.arange(size) / SR
    luck = rng.standard_normal((2, len(modes), 1))
    turn = np.arccos(np.clip(at_hz(LIKENESS, hz), -1, 1)) / 2 * np.sign(luck[1])
    ring = how_loud(db + spread_db * luck[0] - 60 * t / t60)
    sides = []
    for way in (1, -1):
        waves = np.sin(2 * np.pi * hz * t + way * turn)
        sides.append(np.sum(ring * how_loud(way * at_hz(lean, hz) / 2) * waves, axis=0))
    return np.array(sides)


def patchy(x, patch_db, patch_hz, patch_s):
    hz, s, cells = signal.stft(x, SR, nperseg=512)
    field = rng.standard_normal(size=(80, 700))
    places = np.meshgrid(hz / patch_hz, s / patch_s, indexing="ij")
    cells *= how_loud(patch_db * map_coordinates(field, places, order=1))
    return signal.istft(cells, SR, nperseg=512)[1][:, :N]


def drift(rate):
    knots = rng.standard_normal(size=4000)
    return np.interp(np.arange(N) * rate / SR, np.arange(len(knots)), knots)


def at_hz(points, hz):
    points = np.array(points)
    return np.interp(np.log(hz), np.log(points[:, 0]), points[:, 1])


def rms_one(x):
    return x / np.sqrt(np.mean(x ** 2) + 1e-20)


def add(out, s, sound, peak_db):
    i = round(s * SR)
    scaled = how_loud(peak_db) * sound / np.abs(sound.mean(axis=0)).max()
    out[:, i:i + sound.shape[1]] += scaled[:, :N - i]


def scene():
    blows = knocks() + drop()
    return blows + kitchen(blows) + strokes() + bag() + room_tone()


def band_limit(x):
    return signal.sosfilt(signal.butter(12, 17090, fs=SR, output="sos"), x)


def record(dry):
    # (pitch_hz, half_width_hz, level_db)
    deaf_bands = [(10200, 620, -45), (13800, 560, -40)]
    # (low_hz, high_hz, side_level_db)
    narrow_bands = [(11200, 12900, -12), (14700, 16500, -14)]
    hz, s, cells = signal.stft(1.3 * np.tanh(dry / 1.3), SR, nperseg=1024)
    cells = np.array([cells[0] + cells[1], cells[0] - cells[1]]) / 2
    frames = np.minimum(s * SR, N - 1).astype(int)
    pitch = hz[:, None]
    thinned = (s < 4.1) | (s > 7.67)
    for mid_hz, half_hz, db in deaf_bands:
        low_hz = mid_hz - half_hz * how_loud(3 * np.round(0.7 * drift(22)[frames]))
        high_hz = mid_hz + half_hz * how_loud(3 * np.round(0.7 * drift(22)[frames]))
        cells[0, (pitch > low_hz) & (pitch < high_hz) & thinned] *= how_loud(db)
    for low_hz, high_hz, db in narrow_bands:
        low_edge = low_hz + 300 * np.round(drift(18)[frames])
        high_edge = high_hz + 300 * np.round(drift(18)[frames])
        cells[1, (pitch > low_edge) & (pitch < high_edge)] *= how_loud(db)
    cells = np.array([cells[0] + cells[1], cells[0] - cells[1]])
    cells[:, hz > 15950] *= how_loud(-40)
    return band_limit(signal.istft(cells, SR, nperseg=1024)[1][:, :N])


dry = scene()
out = record(dry)
transcribe(out)
```